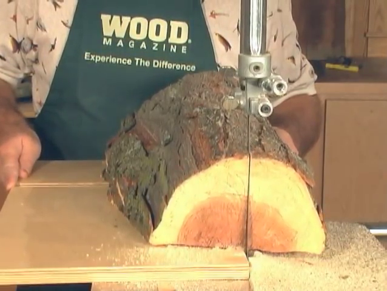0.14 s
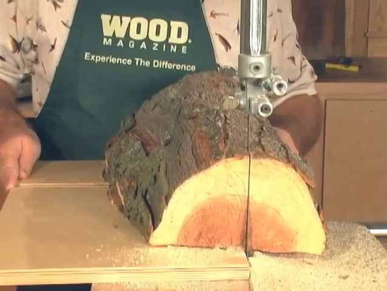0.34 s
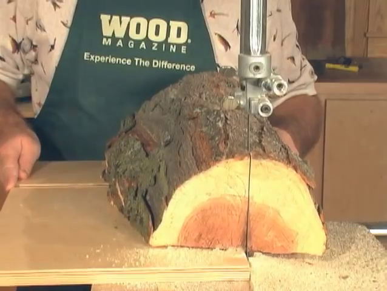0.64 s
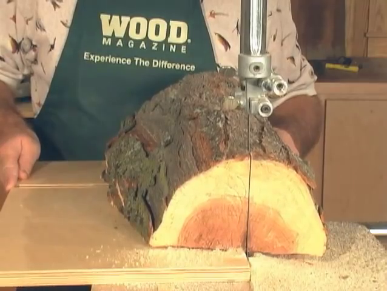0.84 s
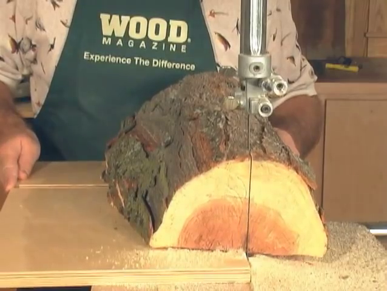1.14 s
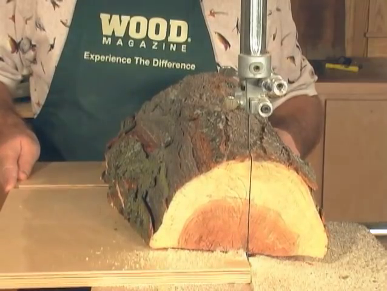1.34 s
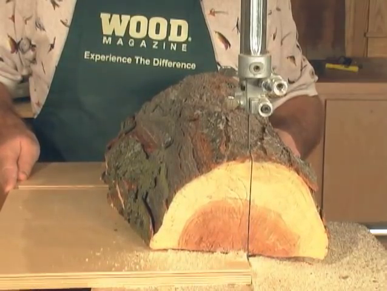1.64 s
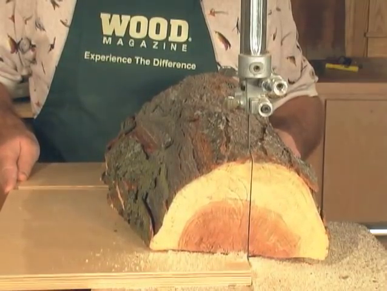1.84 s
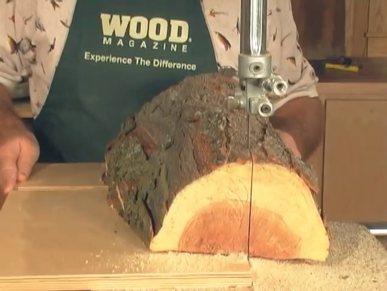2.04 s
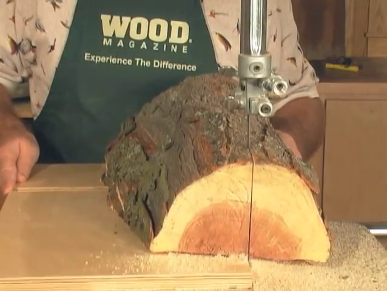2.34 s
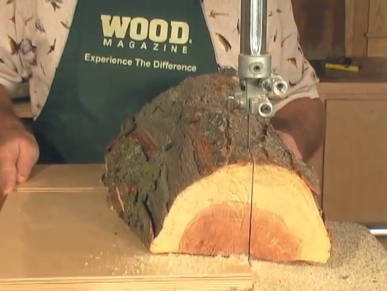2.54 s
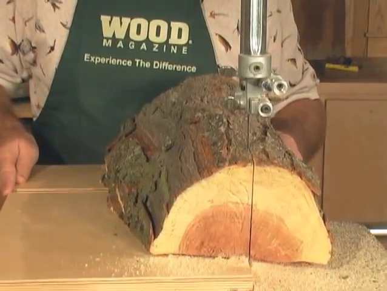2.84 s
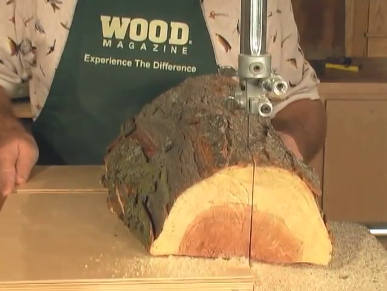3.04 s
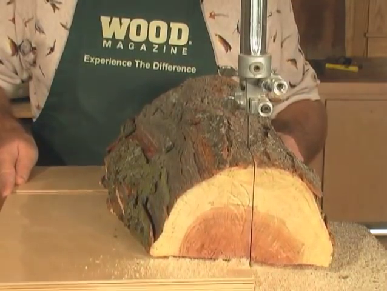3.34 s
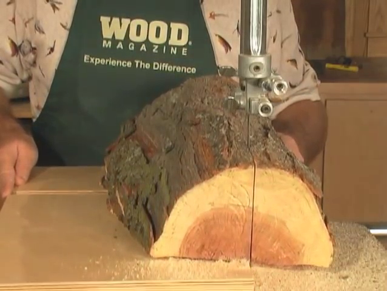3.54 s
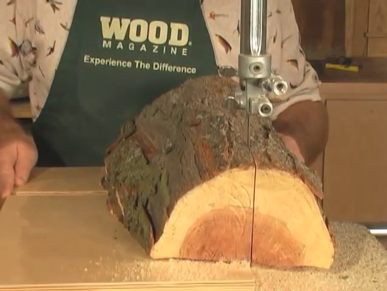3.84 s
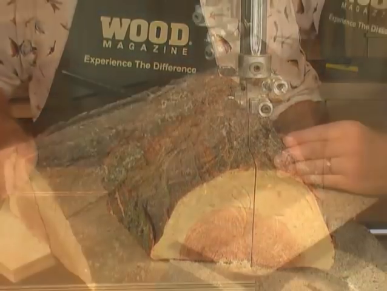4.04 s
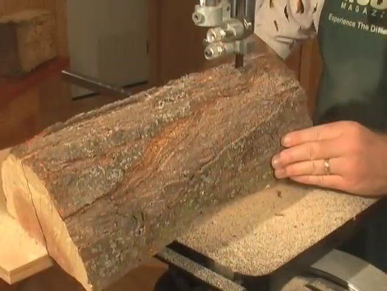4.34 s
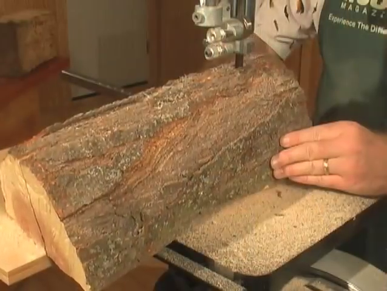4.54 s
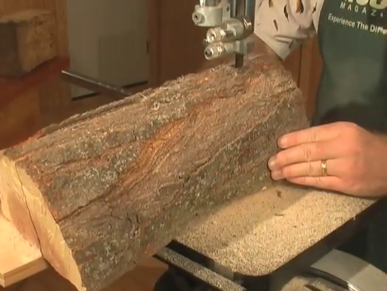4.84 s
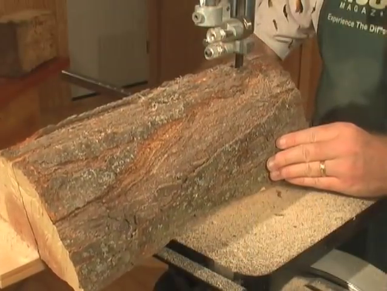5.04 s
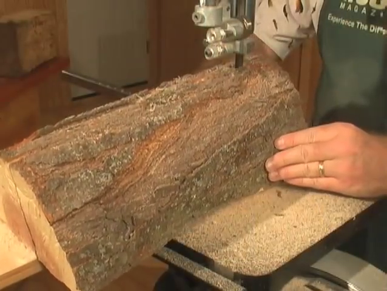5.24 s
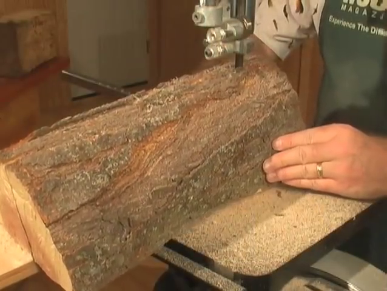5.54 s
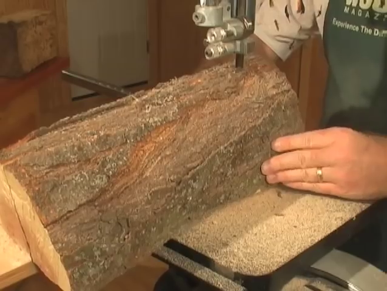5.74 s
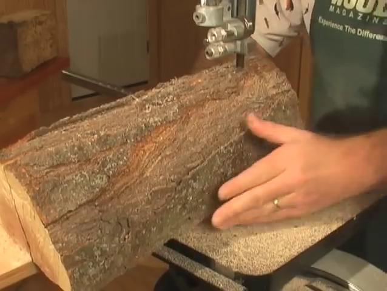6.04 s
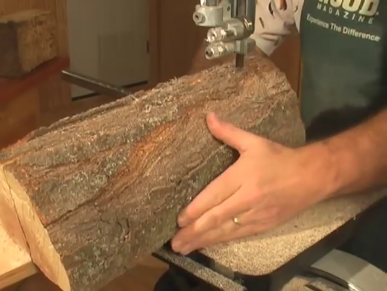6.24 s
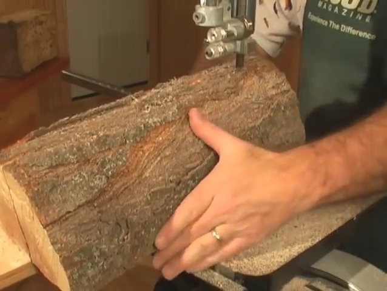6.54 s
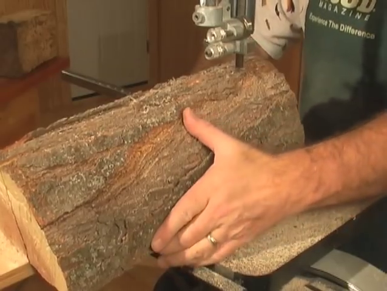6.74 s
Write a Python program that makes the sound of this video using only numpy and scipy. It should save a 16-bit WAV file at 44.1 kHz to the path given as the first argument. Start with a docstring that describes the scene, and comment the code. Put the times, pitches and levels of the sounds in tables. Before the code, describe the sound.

The sound begins already in full cut: a bandsaw ripping a thick log, close, loud and centred, with little room echo. From 0 to about 4 seconds it is a dense, rough roar with hollow wooden and metallic resonances, throbbing about five times a second. Thin tones waver inside it and a mid-pitched growl grows; a small dull pop is buried near 1.3. At about 4 the second perspective enters, overlapping until 4.3, when the first stops abruptly. A fuzzy whine climbs across the change and fades by 4.7. The side cut is brighter in its hiss, with less low body, surging irregularly with each push over a growl and very faint motor hum. From 5.7 to 6.3 the log chatters in quick jolts, with two short rising squeals near 6.0 and 6.1. Treble dulls slightly, a faint pop comes around 6.4, then the hiss reopens and cutting continues to the end.

```python
"""A bandsaw rips a thick log, heard first from the cut end, then from the side; the two views overlap briefly.
Its teeth are rough noise that rings log, frame and blade, each a set of resonances.
The end view adds wavering tones and a growl; the side view adds a growl and the hum of the loaded motor.
A whine climbs around the change of view, the blade squeals near the end, and two dull pops are heard."""
import sys
import numpy as np
from scipy import signal
from scipy.fft import rfft, irfft
from scipy.io import wavfile
from scipy.ndimage import uniform_filter1d

SR = 44100
rng = np.random.default_rng(int(sys.argv[2]) if len(sys.argv) > 2 else 0)


def digitize_waveform(pressure):
    """Quantize a signal to 16-bit integers and store it at the path in sys.argv[1].

    Rows of a 2-D input are taken as channels; values are limited to [-1, 1].
    """
    field = np.atleast_2d(pressure).T
    bounded = np.clip(field, -1, 1)
    quanta = np.round(bounded * 32767).astype(np.int16)
    wavfile.write(sys.argv[1], SR, quanta)


def undo_db(level):
    """Turn decibels back into plain size, where 20 dB means ten times bigger."""
    steps = np.asarray(level, float) / 20
    return 10 ** steps


N = 304731  # length in samples

# parts of the saw sound, in order log boom, frame ring, blade scrape, sizzle, table drone: low_hz, high_hz
PART_BANDS = [(560, 1050), (1050, 2600), (2600, 7000), (7000, 20000), (5, 560)]
# broad colour of the scraping in each view: pitch_hz, level_db (relative power per Hz)
END_COLOUR = [(25, -7), (60, -11.5), (240, -8), (420, 3), (580, 8), (800, 11.5), (1080, 4), (1500, 10),
              (2500, 7.5), (3500, 9), (5500, 2.5), (8000, -5), (11000, -9), (13000, -22.5), (15600, -25.5)]
SIDE_COLOUR = [(25, -18), (210, -11.5), (420, 1), (580, 2.5), (800, 10.5), (1080, 2), (1500, 3.5),
               (2500, 6), (3500, 5.5), (5500, 8), (8000, 2), (11000, -1.5), (13000, -10.5), (15600, -15.5)]
# resonances of log, table and frame, then of blade and guides: pitch_hz, width_hz, level_db (relative)
END_FRAME_MODES = [(205, 21, -6.5), (267, 31, 1.5), (311, 14, 4.5), (376.6, 48, 14), (470.6, 15, 16),
                   (536, 10, -7), (638, 31, 17), (722, 43, 14.5), (763, 31, 17.5), (810, 36, 17),
                   (925, 12, 6), (948, 22, 12), (1054, 15, -1.5), (1077, 21, 8.5), (1190, 57, 9.5),
                   (1300, 25, 12), (1400, 42, 0.5), (1450, 12, 16), (1585, 14, 16.5), (1636, 22, 17),
                   (1700, 41, 12.5), (1860, 26, 9.5), (1950, 68, 10.5), (2120, 35, 13), (2240, 14, 5),
                   (2170, 25, 5.5), (2243, 115, 13), (2390, 80, 8)]
END_BLADE_MODES = [(2650, 120, 8), (3140, 52, -1), (4100, 110, 9.5), (4650, 92, -2), (4990, 150, 5),
                   (6050, 130, 1), (6500, 130, 1.5), (7070, 120, -10), (7520, 220, 1.5), (7650, 161, -11),
                   (8260, 290, 1), (8630, 140, 1), (8800, 100, -4.5), (9080, 160, 0.5), (10650, 719, -10.5),
                   (10400, 190, -10), (11860, 600, -13)]
SIDE_FRAME_MODES = [(206, 34, -7.5), (250, 9.9, -11), (303, 9.1, -5), (370.4, 31, 13.5), (470, 10, -3),
                    (458, 6.2, 17.5), (500, 20, 3), (586, 6.8, 10.5), (620, 27, 13), (677, 45, 14.5),
                    (791, 62, 14), (920, 10, 4), (975, 22, 12.5), (1180, 17, 5), (1275, 24, 6.5),
                    (1516, 31, 11), (1630, 86, 13.5), (1709, 31, 12.5), (1940, 17, 14), (1990, 120, 8),
                    (2173, 150, 9), (2380, 60, 6)]
SIDE_BLADE_MODES = [(2770, 130, 6), (3110, 170, 6.5), (3764, 130, 8.5), (4370, 310, 10.5), (4720, 430, 7.5),
                    (5070, 220, 13.5), (5900, 520, 6), (7550, 200, 7), (7580, 110, 5), (8670, 1700, 3),
                    (10160, 1100, 1.5), (12400, 250, -11.5), (13000, 300, -11)]
# end view, even feed; one row each for boom, ring, scrape, sizzle: start_level_db, end_level_db
END_PART_LEVELS = [(-22, -21.5), (-18, -17.5), (-23.5, -21), (-21.5, -23.5)]
# side view, the log is pushed in surges: time_s, push_db, boom_level_db
PUSHES = [(4.36, -2, -31), (4.48, 2.5, -27), (4.6, -3.5, -30), (4.7, 1, -22), (4.82, 3, -25),
          (4.98, 2, -20), (5.08, -1, -24.5), (5.19, 0, -22.5), (5.29, -0.5, -27.5), (5.4, 4.5, -22),
          (5.52, -2.7, -28), (5.74, 2.3, -24), (5.9, -0.5, -28), (6.0, 0.3, -28), (6.18, -0.5, -27.5),
          (6.3, 2.5, -26.5), (6.64, 0, -27), (6.78, -0.5, -21.5)]
# side view; one row each for ring, scrape, sizzle: level_db (at no push), gain_per_push (dB per dB)
SIDE_PART_LEVELS = [(-19.5, 0.56), (-18, 0.54), (-21, -0.1)]
# a high spot on the wheel, one harder bite each turn: time_s, bite_db (each part takes a share)
WHEEL_BITES = [(0, 4.2), (1.6, 3.5), (2.0, 4.5), (3.1, 1.7)]
# wavering tones of wheel and passing teeth in the end view: pitch_hz, start_level_db, end_level_db
WHEEL_TONES = [(369, -32, -36), (471, -50.5, -35.5), (1522, -37, -39), (1720, -35, -27.5)]
# short pops: time_s, peak_db
POPS = [(1.346, -20), (6.39, -28)]
# side view, treble level over time: time_s, change_db (scaled by TREBLE_SHARES)
TREBLE_CHANGES = [(4.3, -3), (4.75, 1), (5.45, 0.5), (5.7, -1), (6.1, -1), (6.58, 2.5), (6.7, 2.5)]
# where the treble changes act: pitch_hz, share (no unit)
TREBLE_SHARES = [(10500, 0.29), (12500, 1.3)]
# where the hand shades the sound: pitch_hz, share (no unit)
HAND_SHARES = [(900, 0.077), (1250, 0.31), (1600, 0.065), (2500, 0.21), (2850, 1), (3500, .9), (4000, 0.15),
               (4400, 0.49), (8500, 0.084), (9300, 0.54), (11500, 0.6), (14000, 0.65)]
# the log chatters on the table as the grip changes: time_s, jolt_db (scaled where used)
JOLTS = [(5.735, 7), (5.805, 1.5), (5.882, 7), (5.996, 11), (6.022, 7), (6.073, 8), (6.105, 4),
         (6.127, 7.5), (6.148, 2), (6.252, 1), (6.28, 9), (6.31, 2.5)]
# the blade squeals as the log shifts: start_s, hold_s, start_pitch_hz, level_db (before fuzz and chatter)
SQUEALS = [(5.991, .03, 1530, -21), (6.06, 0.074, 1603, -20)]

SIDE_START_S, END_STOP_S = 3.965, 4.315
BITE_TIME_S, WHEEL_TURN_S = 2.07, 0.187  # time of one bite, time for one turn
SHAFT_HZ = 29


def evened(sound):
    """Scales a signal to an rms of 1."""
    return sound / np.sqrt(np.mean(sound ** 2) + 1e-20)


def read(points, hz):
    """Reads a spectrum table at these frequencies, along a logarithmic pitch scale."""
    point_hz, value = np.transpose(points)
    return np.interp(np.log(hz + 1), np.log(point_hz + 1), value)


def curves(rows):
    """Turns each column after the time into one value a sample."""
    time_s, *columns = np.transpose(rows)
    return [np.interp(np.arange(N) / SR, time_s, column) for column in columns]


def wander(top_hz):
    """Chance movement, mostly below top_hz, with an rms of 1."""
    low_pass = signal.butter(2, top_hz, fs=SR, output="sos")
    return evened(signal.sosfilt(low_pass, rng.standard_normal(N)))


def drift(start_db, end_db):
    """A straight change of level over the end view."""
    return np.interp(np.arange(N) / SR, (0, END_STOP_S), (start_db, end_db))


def swell(t, start_s, rise_s, hold_s, fall_s):
    """Goes from 0 to 1, holds, and goes back to 0."""
    rising = (t - start_s) / rise_s
    falling = (start_s + rise_s + hold_s + fall_s - t) / fall_s
    return np.clip(np.minimum(rising, falling), 0, 1)


def fuzzy_tone(hz, gain, width_hz, rough):
    """A tone whose edge is made fuzzy by chance movement of its strength and phase."""
    fuzz = (1 - rough) + rough * (wander(width_hz) + 1j * wander(width_hz))
    turning = np.exp(2j * np.pi * np.cumsum(hz * np.ones(N)) / SR)
    return gain * (fuzz * turning).real


def ringing(power):
    """The ring with this power spectrum that answers a knock as early as possible (minimum phase)."""
    cepstrum = irfft(np.log(power + 1e-12) / 2)
    half = len(cepstrum) // 2
    # fold the backward half onto the forward half
    cepstrum[1:half] *= 2
    cepstrum[half + 1:] = 0
    return irfft(np.exp(rfft(cepstrum)))[:half]


def wheel_bites():
    """A high spot on the wheel makes one narrow swell each turn, in dB."""
    t = np.arange(N) / SR
    turn = np.cos(2 * np.pi * (t - BITE_TIME_S) / WHEEL_TURN_S)
    return curves(WHEEL_BITES)[0] * np.exp(3 * (turn - 1))


def saw(part_levels, colour, modes, drone_db, bite_db, judder_db, swell_db):
    """Uneven bites of the teeth excite log, frame and blade, each at its own level, over a steady table drone."""
    hz = np.fft.rfftfreq(32768, 1 / SR)
    power = undo_db(read(colour, hz)) ** 2
    for mode_hz, width_hz, level_db in modes:
        power += undo_db(level_db) ** 2 / (1 + (2 * (hz - mode_hz) / width_hz) ** 2) ** 2
    shared_db = bite_db * wander(450) + judder_db * wander(17) + swell_db
    shares = (0.21, 0.4, 0.4, 0.41, 0.082)  # how strongly each part follows the bites
    out = np.zeros(N)
    for (low_hz, high_hz), level_db, share in zip(PART_BANDS, part_levels + [drone_db], shares):
        band = 1 / (1 + (low_hz / (hz + 1)) ** 12) / (1 + (hz / high_hz) ** 12)
        own_shake_db = 1.35 * wander(25)
        teeth = rng.standard_normal(N) * undo_db(share * (shared_db + own_shake_db))
        rung = signal.oaconvolve(teeth, ringing(power * band))[:N]
        out += undo_db(level_db) * evened(rung)
    return out


def patchy(sound, patch_db=1.0, shade=None):
    """Bands swell and sink slowly by chance, least in the bass; shade adds its own dB."""
    hz, t, spectrum = signal.stft(sound, SR, nperseg=1024, noverlap=768)
    patches = uniform_filter1d(rng.standard_normal(spectrum.shape), size=5, axis=0)  # smooth over pitch
    patches = uniform_filter1d(patches, size=16, axis=1)  # then over time
    strength = hz / (hz + 900) + (hz / 14000) ** 2
    change_db = patch_db * evened(patches) * strength[:, None]
    if shade:
        change_db += shade(hz, t)
    return signal.istft(spectrum * undo_db(change_db), nperseg=1024, noverlap=768)[1][:N]


def wheel_tones():
    """Wheel and passing teeth give nearly clean tones whose pitch and level waver."""
    out = np.zeros(N)
    for hz, start_db, end_db in WHEEL_TONES:
        level_db = drift(start_db, end_db) + 2.0 * wander(37) + 2.5 * wander(1.85)
        pitch_hz = hz + 4 * wander(12.2)
        out += np.sqrt(2) * undo_db(level_db) * np.sin(2 * np.pi * np.cumsum(pitch_hz) / SR)
    return out


def growl(hz, level_db):
    """A fuzzy tooth tone in which the motor shaft beats once a turn."""
    beat = 1 + 0.59 * np.sin(2 * np.pi * SHAFT_HZ * np.arange(N) / SR)
    return fuzzy_tone(hz, undo_db(level_db), width_hz=6.9, rough=0.51) * beat


def end_growl():
    """The tooth tone of the end view grows with the cut and swells once a wheel turn."""
    t = np.arange(N) / SR
    turn_db = 11 * (np.cos(2 * np.pi * (t - BITE_TIME_S) / WHEEL_TURN_S) - 1)  # 0 down to -22 dB
    return growl(776, drift(-32.5, -17) + turn_db)


def end_view():
    """The saw from the cut end: an even feed with wheel bites, tones and a growl."""
    levels = [drift(*row) for row in END_PART_LEVELS]
    cutting = saw(levels, END_COLOUR, END_FRAME_MODES + END_BLADE_MODES, drone_db=-31,
                  bite_db=1.5, judder_db=1.05, swell_db=wheel_bites())
    return patchy(cutting) + wheel_tones() + end_growl()


def pops():
    """Short dull pops, each a single smooth bump of pressure."""
    t = np.arange(N) / SR
    width_s = 0.00058
    return sum(undo_db(db) * np.exp(-((t - time_s) / width_s) ** 2) for time_s, db in POPS)


def climbing_whine():
    """A fuzzy whine climbs ever more slowly toward its top pitch."""
    t = np.arange(N) / SR
    start_s, lag_s = 3.92, 0.36
    from_hz, to_hz = 800, 1350
    hz = to_hz - (to_hz - from_hz) * np.exp(-np.maximum(t - start_s, 0) / lag_s)
    gain = undo_db(-17.5) * swell(t, start_s, rise_s=0.12, hold_s=0.16, fall_s=0.52)
    return fuzzy_tone(hz, gain, width_hz=45, rough=0.6)


def motor_hum():
    """Two hums near twice the mains rate swell together, partly cancel in turn, and die away."""
    t = np.arange(N) / SR
    hum_hz, beat_hz, beat_top_s = 119.8, 2.15, 4.54
    turn = 2 * np.pi * (t - beat_top_s)
    pair = np.cos(turn * (hum_hz + beat_hz / 2)) + 0.75 * np.cos(turn * (hum_hz - beat_hz / 2))
    level_db = -49 - 12 * np.maximum(t - 4.7, 0)  # holds until 4.7 s, then falls 12 dB a second
    return np.sqrt(2) * undo_db(level_db) * pair


def shading(hz, t):
    """Treble level of the side view in dB: slow changes, and a hand in front of the cut shading part of it."""
    hand_db = -5.5 * swell(t, start_s=5.99, rise_s=0.29, hold_s=0.3, fall_s=0.18)
    treble_db = np.interp(t, *np.transpose(TREBLE_CHANGES))
    return np.outer(read(HAND_SHARES, hz), hand_db) + np.outer(read(TREBLE_SHARES, hz), treble_db)


def jolts():
    """The log chatters on the table as the grip changes: short swells, in dB."""
    t = np.arange(N) / SR
    width_s = 0.006
    return sum(db * np.exp(-((t - time_s) / width_s) ** 2) for time_s, db in JOLTS)


def side_view():
    """The saw from the side: the log is pushed in surges and jolts, with a growl and the motor hum."""
    push_db, boom_db = curves(PUSHES)
    levels = [boom_db] + [db + follow * push_db for db, follow in SIDE_PART_LEVELS]
    cutting = saw(levels, SIDE_COLOUR, SIDE_FRAME_MODES + SIDE_BLADE_MODES, drone_db=-29,
                  bite_db=1.0, judder_db=1.3, swell_db=0.91 * jolts())
    side_growl = growl(784, -24.5 + 1.6 * (boom_db + 23.5))  # follows the log boom
    return patchy(cutting, shade=shading) + motor_hum() + side_growl


def squeals():
    """The blade squeals as the log shifts: short fuzzy tones that rise in pitch and surge with the chatter."""
    t = np.arange(N) / SR
    edge_s = 0.019
    out = np.zeros(N)
    for start_s, hold_s, start_hz, level_db in SQUEALS:
        hz = start_hz + 400 * (t - start_s)  # climbs 400 Hz a second
        gain = undo_db(level_db) * swell(t, start_s, edge_s, hold_s, edge_s)
        out += fuzzy_tone(hz, gain, width_hz=20, rough=0.3)
    return out * undo_db(1.6 * jolts())


def scene():
    """The side view fades in fast; the end view stops dead; both channels are alike."""
    t = np.arange(N) / SR
    end = end_view() * np.clip((END_STOP_S - t) / 0.0027, 0, 1)
    side = side_view() * np.clip((t - SIDE_START_S) / 0.04, 0, 1)
    mono = end + side + climbing_whine() + squeals() + pops()
    return np.array([mono, mono])


def top_cut(x):
    """Nothing passes above the cut-off."""
    return signal.sosfilt(signal.butter(12, 15660, fs=SR, output="sos"), x)


def record(dry):
    """Clips the mix hard at full scale."""
    mix = np.clip(dry, -1, 1)
    return top_cut(mix)


dry = scene()
out = record(dry)
digitize_waveform(out)
```